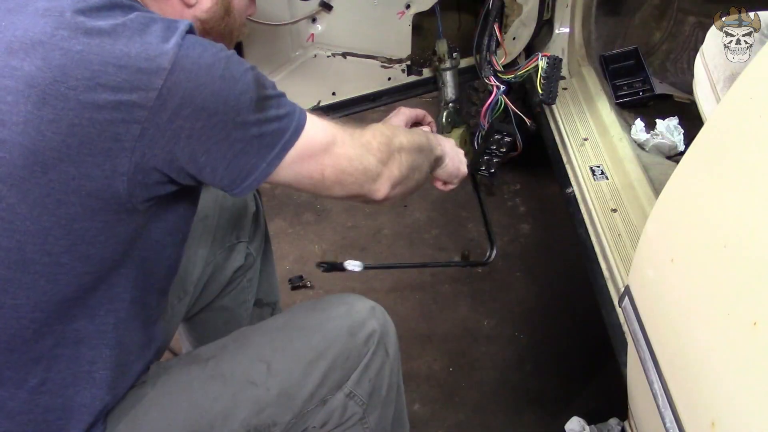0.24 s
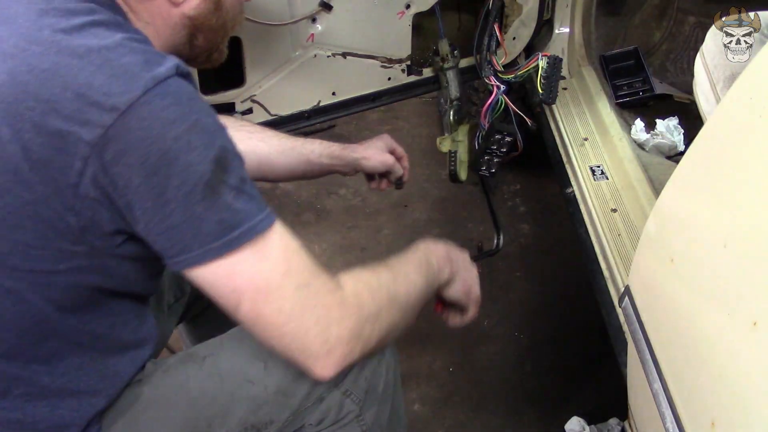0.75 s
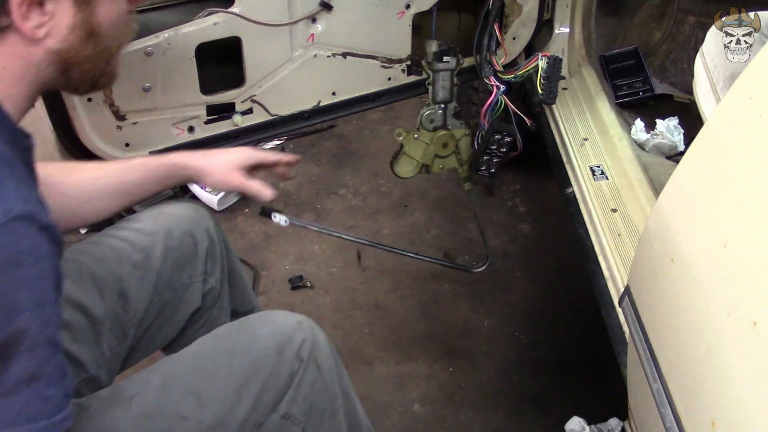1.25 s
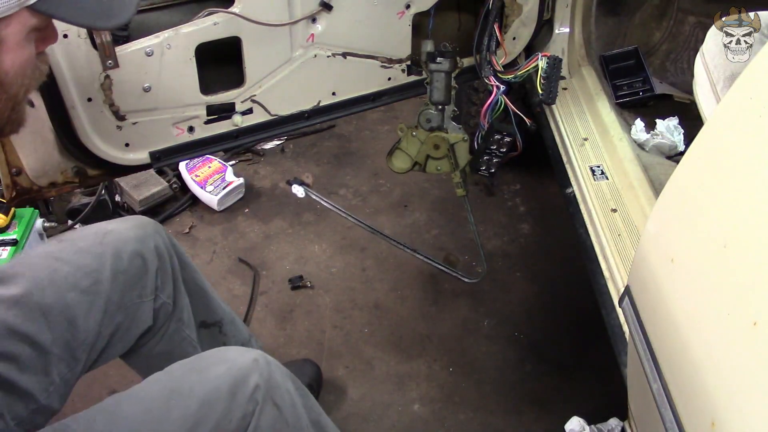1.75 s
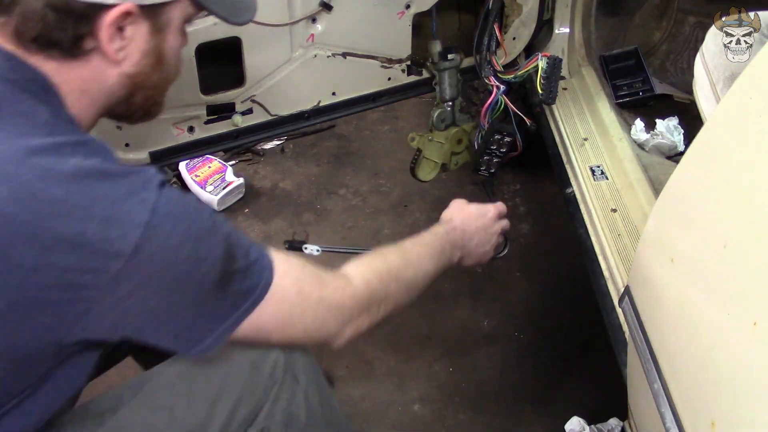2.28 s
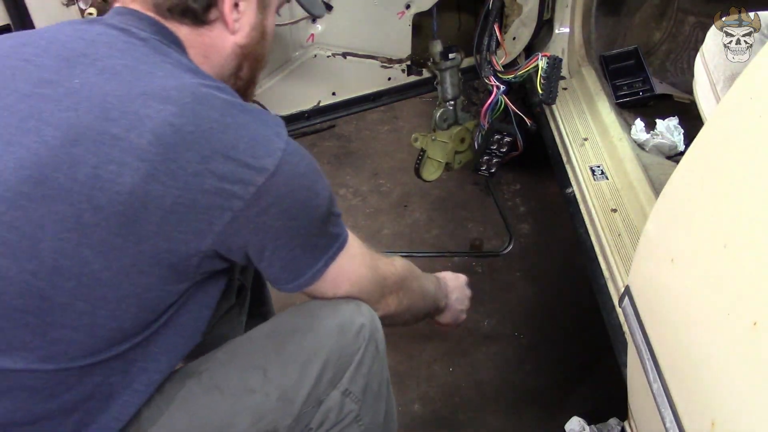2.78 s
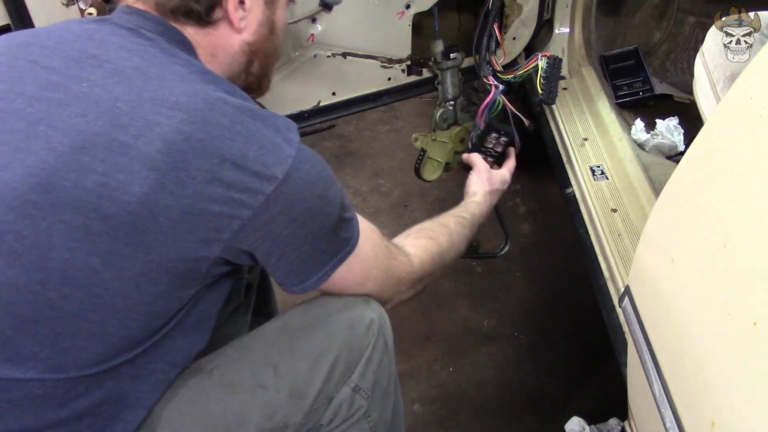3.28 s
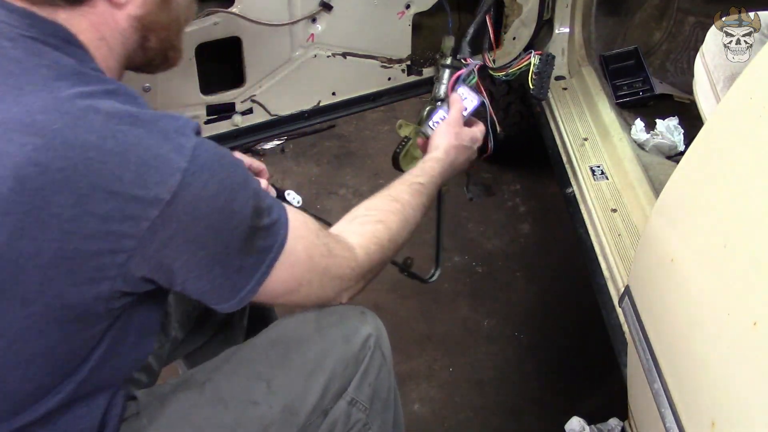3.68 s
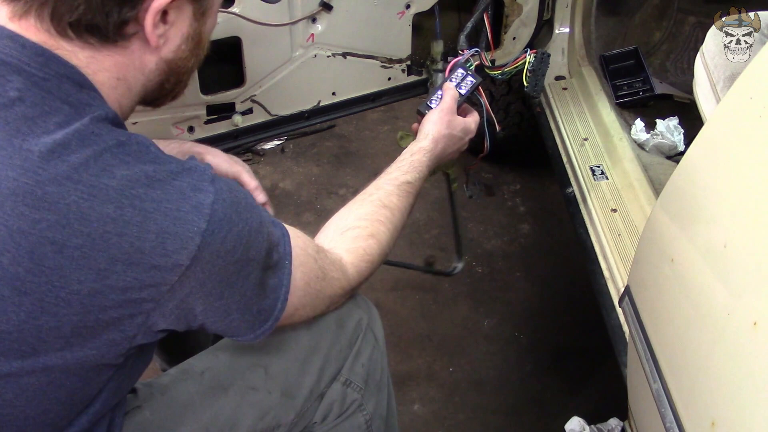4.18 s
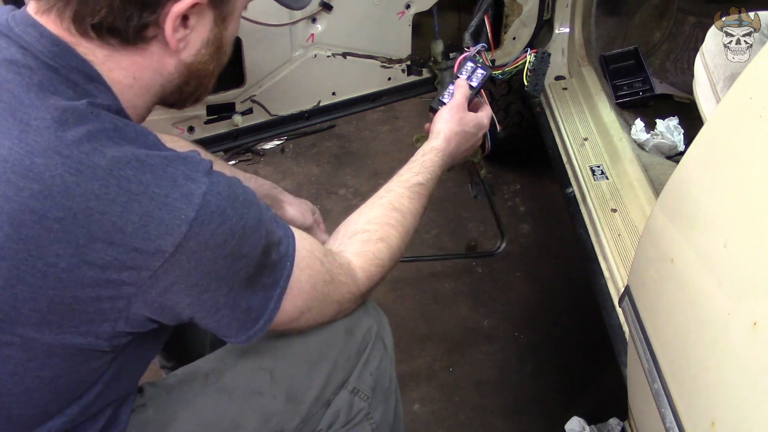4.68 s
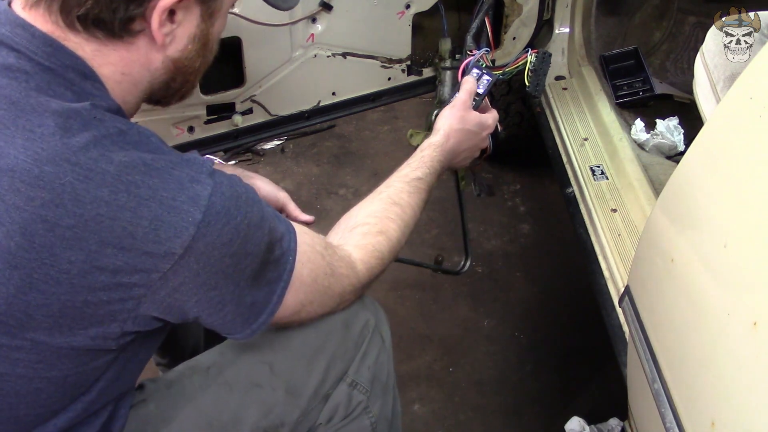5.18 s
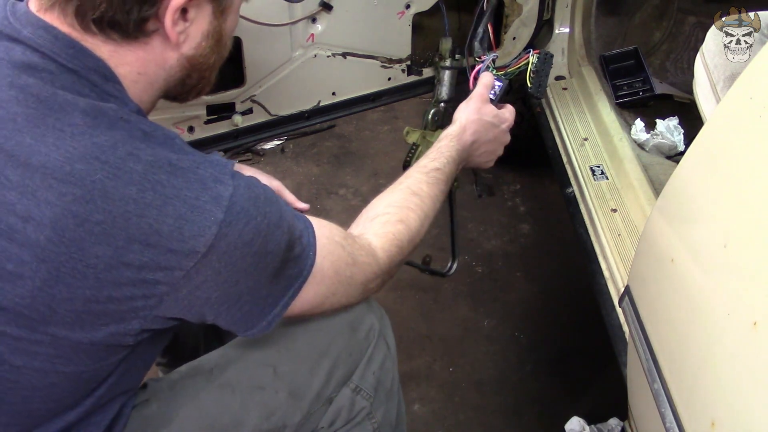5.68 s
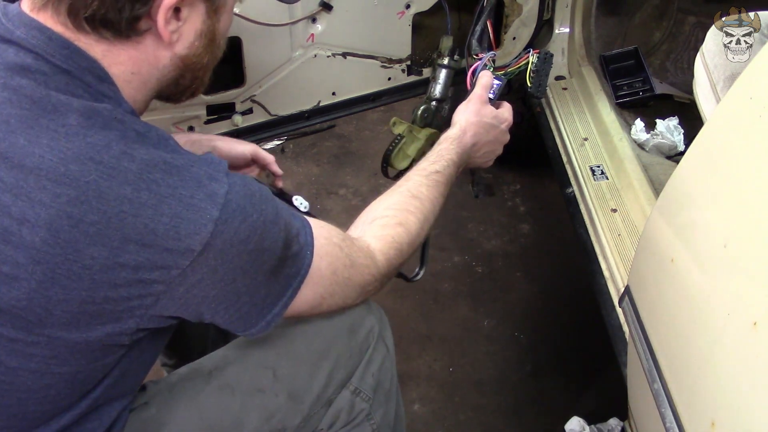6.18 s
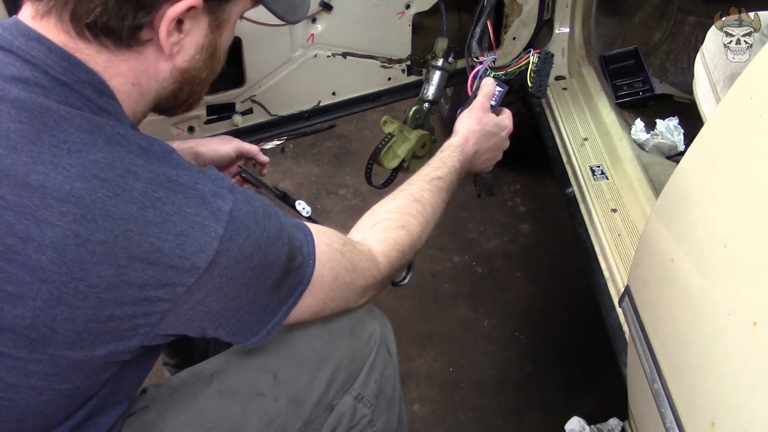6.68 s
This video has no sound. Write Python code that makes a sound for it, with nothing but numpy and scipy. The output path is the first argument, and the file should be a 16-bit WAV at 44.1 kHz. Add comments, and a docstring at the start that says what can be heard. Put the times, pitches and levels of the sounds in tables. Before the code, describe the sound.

Close handling clicks and gritty scuffs, a bouncing metal rod, a scraping switch panel, then a loose window motor starts buzzing and keeps running.

```python
"""In a garage, hands work close by on a car door. Plastic parts snap with a crack and decaying chatter; shoes
and clothes scuff gritty concrete as jerky trains of tiny impacts; a steel rod bounces, rings and is dragged.
A switch panel scrapes as it is lifted on its wires and clicks, and the door booms at soft bumps.
A loose window motor starts and whirs from hum, gear churn and brush rasp; its resonance sinks as it swings.
Steady hiss and a mains hum lie behind."""
import sys
import numpy as np
from scipy import signal
from scipy.fft import irfft
from scipy.io import wavfile
from scipy.ndimage import uniform_filter1d, map_coordinates

SR = 44100
rng = np.random.default_rng(int(sys.argv[2]) if len(sys.argv) > 2 else 0)


def wav_out(sig):
    """Save sig, one row per channel (or a flat mono array), as 16-bit PCM at SR to the path in sys.argv[1]."""
    wavfile.write(sys.argv[1], SR, np.round(np.clip(np.atleast_2d(sig).T, -1, 1) * 32767).astype(np.int16))


N = 306186
TIME = np.arange(N) / SR


def amp(db):
    """Decibels to gain."""
    return 10 ** (np.asarray(db) / 20)


def unit(x):
    """Scales to rms 1."""
    return x / np.sqrt(np.mean(x ** 2) + 1e-20)


def read(points, hz):
    """Reads a spectrum on a log-frequency axis."""
    f, value = np.transpose(points)
    return np.interp(np.log(hz + 1), np.log(f + 1), value)


def follow(curve):
    """Reads a control curve at every sample."""
    return np.interp(TIME, *np.transpose(curve))


def add(mix, s, sound):
    """Mixes a sound in at time s."""
    part = mix[max(round(s * SR), 0):][:len(sound)]
    part += sound[:len(part)]


def colour(x, points, peaks=()):
    """Causal minimum-phase filter: a spectrum with resonances (Hz, width Hz, dB) on top."""
    size = 2048
    hz = abs(np.fft.fftfreq(size, 1 / SR))
    db = read(points, hz)
    for f, width, rise in peaks:
        db = db + rise / (1 + (2 * (hz - f) / width) ** 2)
    response = np.exp(np.conj(signal.hilbert(np.log(amp(db)))))
    return signal.oaconvolve(x, np.fft.ifft(response).real)[:len(x)]


def drift(rate):
    """Smooth chance of rms 1 that changes about rate times a second."""
    knots = rng.standard_normal(4096)
    line = np.interp(TIME * rate, np.arange(len(knots)), knots)
    return unit(uniform_filter1d(line, 200))


def grains(per_s, spread_db):
    """A random train of tiny impacts, a few of them large."""
    sign = rng.choice([-1, 1], N)
    size = amp(spread_db * np.minimum(rng.exponential(1, N), 4))
    return sign * size * (rng.random(N) < per_s / SR)


def wander(x, depth_db):
    """The point of contact moves, so each slip favours other resonances."""
    hz, _, z = signal.stft(x, SR, nperseg=512)
    patches = uniform_filter1d(rng.standard_normal(z.shape), size=5, axis=1)
    patches = unit(uniform_filter1d(patches, size=2, axis=0))
    band = np.sqrt(hz / 2).astype(int)  # patches widen towards the treble
    return unit(signal.istft(z * amp(depth_db * patches[band]), SR, nperseg=512)[1][:N])


def stroke(start, rise, length, sag_db_per_s=23.5, release_s=0.06):
    """Envelope of one rub: attack, a sagging hold, release."""
    age = np.maximum(TIME - start, 0)
    hold = amp(-sag_db_per_s * np.minimum(age, length))
    return np.minimum(age / rise, 1) * hold * np.exp(-np.maximum(age - length, 0) / release_s)


def ring(modes, length):
    """Freely dying modes (Hz, dB, t60 s) of a struck body."""
    t = np.arange(int(length * SR)) / SR
    return sum(amp(db - 60 * t / t60) * np.sin(2 * np.pi * hz * t) for hz, db, t60 in modes)


def knock(spectrum, level_db, bass_db, treble_db, crack, snap_s=0.0051, thud_s=0.027):
    """A part lands with one crack and a few ms of chatter; its bass dies more slowly than its treble."""
    t = np.arange(4096) / SR
    chatter = colour(rng.choice([-1., 1.], len(t)) + crack * (t == 0), spectrum)
    bass_hz, treble_hz, mid_db = 900, 4600, -12
    bands = [(bass_hz, "low", bass_db, thud_s),
             ([bass_hz, treble_hz], "band", mid_db, snap_s),
             (treble_hz, "high", treble_db, snap_s)]
    out = 0
    for edge, kind, db, life in bands:
        sos = signal.butter(3, edge, kind, fs=SR, output="sos")
        out = out + amp(db) * unit(signal.sosfilt(sos, chatter * np.exp(-t / life)))
    return amp(level_db) * out


# the garage's steady hiss: (frequency [Hz], level [dB])
AIR_SPECTRUM = [(25, -34), (120, -3), (260, 0), (600, -9.5), (8500, -27), (16000, -42)]
AIR_DB, MAINS_DB, MAINS_HZ = -55.5, -56.5, 240


def air():
    """Steady hiss, most alike in both channels in the bass, and a mains hum."""
    mid, side = (unit(colour(rng.standard_normal(N), AIR_SPECTRUM)) for _ in range(2))
    side = colour(side, [(200, -18.5), (600, -9)])
    mains = amp(MAINS_DB) * unit(np.sin(2 * np.pi * MAINS_HZ * TIME))
    return amp(AIR_DB) * (mid + np.array([side, -side])) + mains


# how long the garage rings: (frequency [Hz], decay by 60 dB [s])
GARAGE_DECAY = [(200, 0.48), (700, 0.23), (5000, 0.27), (15000, 0.1)]


def garage(x, wet_db, build_s=0.0025):
    """Dense reflections build up and die band by band; the channels differ mostly in the treble."""
    t = np.arange(SR // 2) / SR
    taps = rng.standard_normal((2, len(t))) * (rng.random((2, len(t))) < .12)
    taps = taps * (1 - np.exp(-t / build_s))
    hz, s, z = signal.stft(taps, SR, nperseg=256)
    decay = amp(-60 * s / read(GARAGE_DECAY, hz)[:, None])
    tails = signal.istft(z * decay, SR, nperseg=256)[1]
    tails = tails / np.linalg.norm(tails[0])
    mid, side = amp(wet_db) * signal.fftconvolve(x[None], tails, axes=1)[:, :N]
    side = colour(side, [(200, -33), (4500, -12.0)])
    return (x + mid + np.array([side, -side])) / np.sqrt(1 + amp(wet_db) ** 2)


# soft bumps against the door: (time [s], level [dB])
THUD_TIMES = [(0.311, -30), (4.306, -36.5)]
# modes of the hollow door: (frequency [Hz], level [dB], decay by 60 dB [s])
DOOR_MODES = [(185, 0.5, 0.2), (292, 6, 0.069)]


def bumps(soft_s=0.0025):
    """The hollow door's modes boom at each soft blow."""
    boom, out = ring(DOOR_MODES, .5), np.zeros(N)
    boom = boom * (1 - np.exp(-TIME[:len(boom)] / soft_s))
    for s, db in THUD_TIMES:
        add(out, s, amp(db) * boom / abs(boom).max())
    return out


# strokes of a sole, of cloth or of the dragged rod:
# (start [s], rise [s], length [s], rub level [dB], grit level [dB before grit_db])
SCUFF_STROKES = [(0.216, 0.043, 0.16, -42.5, -54), (0.659, 0.15, 0.2, -60, -51),
                 (0.928, 0.12, 0.45, -32, -44), (1.136, 0.019, 0.41, -43, -46),
                 (1.674, 0.069, 0.17, -44, -45.5), (2.112, 0.04, 0.034, -42.5, -41.5),
                 (2.26, 0.014, 0.11, -42.5, -53), (2.363, 0.0051, 0.21, -36, -43.5),
                 (2.649, 0.024, 0.22, -41.5, -48.5), (3.457, 0.019, 0.041, -40, -58),
                 (3.894, 0.023, 0.33, -50.5, -52), (4.15, 0.13, 0.15, -43.5, -60),
                 (4.666, 0.017, 0.2, -49.5, -59.5), (5.202, 0.019, 0.053, -48.5, -56.5)]
# the dull rub: (frequency [Hz], level [dB])
RUB_SPECTRUM = [(50, -48.5), (130, -3.5), (450, 9), (850, 3), (1500, -2), (2600, -28.5), (9000, -28)]
# the cracking grit: (frequency [Hz], level [dB])
GRIT_SPECTRUM = [(500, -32), (1700, -1), (12000, -14), (16000, -44)]


def scuffs(grit_db=2):
    """Soles, cloth and steel slip in uneven jerks, bumping over the floor and cracking grit."""
    jerks = amp(2 * drift(rate=83))
    rub = wander(colour(grains(per_s=900, spread_db=2.5) * jerks, RUB_SPECTRUM), depth_db=3)
    grit = wander(colour(grains(per_s=3500, spread_db=4) * jerks, GRIT_SPECTRUM), depth_db=2)
    weight, sand = 0, 0
    for start, rise, length, weight_db, sand_db in SCUFF_STROKES:
        shape = stroke(start, rise, length)
        weight = np.maximum(weight, shape * amp(weight_db))
        sand = np.maximum(sand, shape * amp(sand_db))
    return rub * weight + grit * sand * amp(grit_db)


# the switch panel is lifted on its wires: (start [s], rise [s], length [s], level [dB])
SCRAPE_STROKES = [(3.413, 0.088, 0.27, -37.5), (3.659, 0.041, 0.031, -28)]
# tone of the scraping: (frequency [Hz], level [dB])
SCRAPE_SPECTRUM = [(90, -26), (175, 7), (1000, 1.5), (4500, -6), (10500, -13), (16000, -41)]
# resonances of the plastic shell: (frequency [Hz], width [Hz], rise [dB])
SHELL_PEAKS = [(555, 30, 10), (900, 150, 7.5), (3060, 1300, 4.5)]


def scrapes():
    """The switch panel and its wires catch and slip as they are lifted; the plastic shell rings."""
    slips = colour(grains(per_s=1300, spread_db=3), SCRAPE_SPECTRUM, SHELL_PEAKS)
    lifts = sum(amp(db) * stroke(start, rise, length) for start, rise, length, db in SCRAPE_STROKES)
    return wander(slips, depth_db=2.5) * lifts


# small metal parts touch: (time [s], level [dB], ring [Hz])
TINK_TIMES = [(0.043, -28, 6360), (1.281, -30, 4130), (1.435, -35, 9440), (2.283, -31, 4370),
              (2.553, -41, 4330)]


def tinks(t60=0.038, chatter_s=0.0024):
    """Small metal parts chatter for an instant and ring briefly."""
    t, out = np.arange(SR // 20) / SR, np.zeros(N)
    for s, db, hz in TINK_TIMES:
        contact = rng.standard_normal(len(t)) * np.exp(-t / chatter_s)
        tink = signal.fftconvolve(contact, ring([(hz, 0, t60)], .1))
        add(out, s, amp(db) * tink / abs(tink).max())
    return out


# thin dry cracks: the snap's second crack, then grit and wire ends: (time [s], level [dB])
TICK_TIMES = [(0.2192, -9.5), (1.089, -22), (1.4334, -17.5), (1.633, -31.5), (2.619, -29.5), (2.944, -34),
              (3.273, -31), (3.803, -30), (4.514, -31), (4.86, -40), (5.462, -29)]
# tone of a crack: (frequency [Hz], level [dB])
TICK_SPECTRUM = [(700, -8), (4000, 1.5), (10000, -2), (16000, -22)]


def ticks(life_s=0.0017):
    """Brief dry cracks without body or ring."""
    t, out = np.arange(SR // 20) / SR, np.zeros(N)
    for s, db in TICK_TIMES:
        tick = colour(rng.choice([-1., 1.], len(t)) * np.exp(-t / life_s), TICK_SPECTRUM)
        add(out, s, amp(db) * tick / abs(tick).max())
    return out


# plastic parts and the switch: (time [s], level [dB before level_db],
# bass [dB re level], treble [dB re level, before dull_db])
PLASTIC_CLICKS = [(0.0362, -24.5, -14, -14.5), (0.2082, -26, -14.5, 12.5), (0.263, -20.5, -20.5, -8.5),
                  (0.575, -40.5, -5, -18), (1.175, -19.5, -20, -11), (1.354, -30, -2.5, -18),
                  (1.567, -35, -7.5, -31), (1.7065, -36, -33, -9), (2.377, -28, -2.5, -24),
                  (2.552, -26.5, -12, -20), (2.674, -34, -10.5, -14), (2.713, -25, -24, -20.5),
                  (3.4324, -29.5, -9.5, -18.5), (3.642, -27.5, -14, -12), (3.735, -28.5, -15, -17),
                  (3.8394, -27, -15.5, -12), (3.9067, -29.5, -10.5, -10.5), (4.258, -33.5, -41, -18),
                  (4.348, -22.5, -18.5, -12.5), (4.667, -29.5, -16.5, -8), (5.002, -29.5, -23, 6),
                  (5.0194, -29, -22, -1), (5.1174, -26.5, -26.5, 4), (5.6107, -28.5, -23, 3.5),
                  (5.6497, -23, -13, -10.5)]
# tone of the plastic: (frequency [Hz], level [dB])
PLASTIC_SPECTRUM = [(50, -24), (170, 7), (500, 16), (1100, 12.5), (2100, 15), (7800, 1), (11500, -2.5),
                    (16000, -23)]


def plastic(level_db=-7, dull_db=-6, crack=6):
    """Snaps and knocks of connectors, loose parts and the switch, with the treble dulled."""
    out = np.zeros(N)
    for s, click_db, bass_db, treble_db in PLASTIC_CLICKS:
        add(out, s, knock(PLASTIC_SPECTRUM, level_db + click_db, bass_db, treble_db + dull_db, crack))
    return out


# the rod hits the floor: (time [s], blow level [dB before level_db],
# bass [dB re blow], treble [dB re blow], ring of the upper modes [dB])
ROD_BOUNCES = [(1.8971, -10.5, -6, -5, -14), (1.9222, -4.5, -20, -31, -32), (1.9611, -7, -18.5, -20, -13.5),
               (2.0030, -20, -11.5, -22, -21), (2.0608, -16, -11.5, -27, -29.5),
               (2.101, -24.5, -31, -16, -29)]
# tone of steel on concrete: (frequency [Hz], level [dB])
STEEL_SPECTRUM = [(50, -34), (130, 1), (540, 19), (900, 9.5), (6500, 6), (16000, -15.5)]


def rod_blows(level_db=-11.0, crack=13.5):
    """The crack of steel on concrete at each bounce."""
    out = np.zeros(N)
    for s, blow_db, bass_db, treble_db, _ in ROD_BOUNCES:
        blow = knock(STEEL_SPECTRUM, level_db + blow_db, bass_db, treble_db, crack, snap_s=0.0045, thud_s=.014)
        add(out, s, blow)
    return out


# the rod's upper bending modes: (frequency [Hz], level [dB re the bounce's ring])
ROD_MODES = [(2007, -1), (3288, -8.5), (3490, -17), (4190, -15), (6080, -19)]
ROD_LOW_HZ, ROD_LOW_DB = 1578, -20.5
ROD_LOW_T60, ROD_T60, ROD_RESTS_S = 1.2, .27, 2.135  # seconds


def rod_ring(settle_s=0.03):
    """The lowest mode sings on; each bounce renews or checks the upper ones, until the floor stills all."""
    s, *_, upper_db = np.transpose(ROD_BOUNCES)
    last = np.maximum(np.searchsorted(s, TIME) - 1, 0)  # latest bounce
    upper = amp(upper_db[last] - 60 * abs(TIME - s[last]) / ROD_T60)
    upper = uniform_filter1d(upper, size=60)
    low = amp(ROD_LOW_DB - 60 * abs(TIME - s[0]) / ROD_LOW_T60)
    out = low * np.sin(2 * np.pi * ROD_LOW_HZ * TIME)
    for k, (hz, db) in enumerate(ROD_MODES, 1):
        jostle = k / len(ROD_MODES)  # rattling on the floor disturbs the higher modes most
        level = upper * amp(db + 4 * jostle * drift(rate=110))
        out = out + level * np.sin(2 * np.pi * hz * TIME + 2 * jostle * drift(rate=110))
    stilled = np.exp(-np.maximum(TIME - ROD_RESTS_S, 0) / settle_s)
    return out * (TIME > s[0]) * stilled


MOTOR_ON_S, FADE_IN_S = 5.682, 0.014


def fading(life_s):
    """One until the motor is on, then dying away."""
    return np.exp(-np.maximum(TIME - MOTOR_ON_S, 0) / life_s)


# the motor's speed: (time [s], speed [turns/s])
MOTOR_SPEED = [(5.8, 58.3), (5.868, 56.9), (6.092, 56.2), (6.218, 57.4), (6.434, 57.9), (6.716, 60.1)]


def shaft(wobble=0.002034):
    """Turns made by the armature, with a slight unsteadiness."""
    return np.cumsum(follow(MOTOR_SPEED) * (1 + wobble * drift(rate=40))) / SR


# multiples of the shaft speed from the fourth up, before the swing: (level [dB before trim_db])
HUM_BEFORE = [-91, -43.5, -52, -47, -69, -63, -50.5, -46.5, -55, -52, -45.5, -49, -42.5, -50]
# the same multiples after the swing: (level [dB before trim_db])
HUM_AFTER = [-59, -49, -48, -44.5, -49, -45, -42.5, -39.5, -45, -43.5, -55, -66, -50, -59]
# the motor's low throb: (time [s], level [dB])
THROB_LEVEL = [(5.8, -37), (6.05, -51), (6.508, -49.5), (6.738, -39.5)]
RESONANCE_HZ, SINK_HZ = 870, 282  # the housing's resonance at rest, and how far the swing lowers it


def hum(turns, swing, settle_s=0.18, rise_db=4, width_hz=200, trim_db=-2):
    """Cogging throbs three times a turn; higher multiples swell as the housing's resonance passes them."""
    speed, centre, out = follow(MOTOR_SPEED), RESONANCE_HZ - SINK_HZ * swing, 0
    for order, (before_db, after_db) in enumerate(zip(HUM_BEFORE, HUM_AFTER), 4):
        resonance_db = rise_db / (1 + (2 * (order * speed - centre) / width_hz) ** 2)
        db = before_db + (after_db - before_db) * swing + resonance_db
        backlash = .4 * drift(rate=35)
        level = amp(db + trim_db + 2.8 * drift(rate=14))
        out = out + level * np.cos(2 * np.pi * (order * turns + rng.random()) + backlash)
    throb = unit(np.sin(2 * np.pi * 3 * turns) * amp(drift(rate=10)))
    return (1 - fading(settle_s)) * (out + amp(follow(THROB_LEVEL)) * throb)


def rubbing(turns, repeat, burst, release_turns):
    """One rough surface passes every turn, catching at one angle and easing off; the rest is fresh chance."""
    surface = irfft(np.exp(2j * np.pi * rng.random(361)))
    angle = turns % 1
    same = map_coordinates(surface - surface.mean(), [angle * len(surface)], order=3, mode="grid-wrap")
    press = 1 + burst * amp(2.2 * drift(rate=40)) * np.exp(-angle / release_turns)
    return press * (np.sqrt(repeat) * unit(same) + np.sqrt(1 - repeat) * rng.standard_normal(N))


# tone of the gears: (frequency [Hz], level [dB])
GEAR_SPECTRUM = [(60, -74), (200, -0.5), (850, 5), (1700, -0.5), (2700, -8), (6000, -31)]
# resonance of the gearbox: (frequency [Hz], width [Hz], rise [dB])
GEARBOX_PEAK = [(1190, 19, 10.5)]
# tone of the brushes: (frequency [Hz], level [dB])
BRUSH_SPECTRUM = [(1000, -7), (3000, 3), (9000, -3), (11800, -17.5), (16000, -33)]
# the housing's resonances and hollows:
# (frequency [Hz], width [Hz], rise before the swing [dB], rise after it [dB])
HOUSING_PEAKS = [(2550, 450, -8, -1), (3690, 240, 5, 11), (4730, 280, 8, 6), (5170, 450, -6, -7),
                 (6680, 420, 5, 8), (7450, 300, 2, 4), (9850, 750, 9, 4)]
LURCH_DB, LURCH_S = 11, 0.06  # the gears take up their play
DIP_DB, DIP_S = -5, 0.21  # brushes start quieter and recover; the same dip softens the gears' initial lurch
SEGMENTS = 10  # of the commutator


def whirr(turns, swing, gears_db=-39.5, gears_away_db=-4, brushes_db=-40, brushes_away_db=0.5):
    """The worm gear churns; brushes buzz on the commutator and ring the housing, coloured by the swing."""
    churn = rubbing(turns + .2, repeat=.65, burst=1.6, release_turns=.4)
    gears = wander(colour(churn, GEAR_SPECTRUM, GEARBOX_PEAK), depth_db=1)
    commutator = 1 + .4 * np.cos(2 * np.pi * SEGMENTS * turns)
    rasp = commutator * rubbing(turns - .2, repeat=.6, burst=4 - 2 * swing, release_turns=.22)
    hz, width, *levels = np.transpose(HOUSING_PEAKS)
    before, after = (unit(colour(rasp, BRUSH_SPECTRUM, list(zip(hz, width, db)))) for db in levels)
    # the buzz's colour follows the swing and wavers at random
    blend = np.clip(swing + .25 * drift(rate=9), 0, 1)
    brushes = before + (after - before) * blend
    dip_db = DIP_DB * fading(DIP_S)
    gears_level = amp(gears_db + LURCH_DB * fading(LURCH_S) + dip_db + gears_away_db * swing ** 2)
    brushes_level = amp(brushes_db + dip_db + brushes_away_db * swing ** 2)
    return gears * gears_level + brushes * brushes_level


# how far the loose motor has swung round: (time [s], share of the whole swing [0-1])
MOTOR_SWING = [(5.95, 0), (6.44, 0.3), (6.58, 0.85), (6.8, 1)]


def motor():
    """The window motor comes in quickly and runs on; only its whirr excites the garage."""
    turns, swing = shaft(), follow(MOTOR_SWING)
    on = np.clip(1 + (TIME - MOTOR_ON_S) / FADE_IN_S, 0, 1)  # full level at MOTOR_ON_S
    return garage(on * whirr(turns, swing), wet_db=-9) + on * hum(turns, swing)


def scene():
    """All sources in the garage; the handling is a little to the left."""
    soft = bumps() + scuffs() + scrapes() + tinks()
    sharp = ticks() + plastic() + rod_blows()
    handling = garage(soft, wet_db=-5.5) + garage(sharp, wet_db=-5.0) + rod_ring()
    return air() + handling * amp([[.25], [-.25]]) + motor()


EDGE_HZ = 16200


def record(dry):
    """Limits the band with a steep low-pass."""
    lowpass = signal.firwin(255, EDGE_HZ, window=("kaiser", 9), fs=SR)
    return signal.oaconvolve(dry, lowpass[None], "same")


dry = scene()
out = record(dry)
wav_out(out)
```